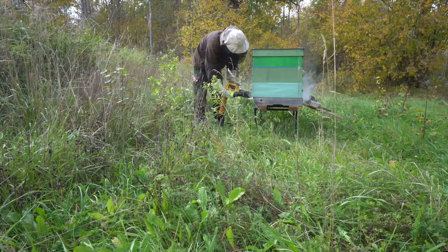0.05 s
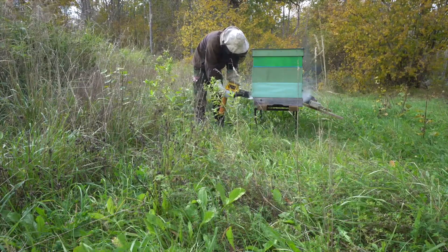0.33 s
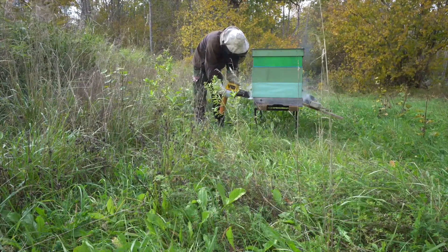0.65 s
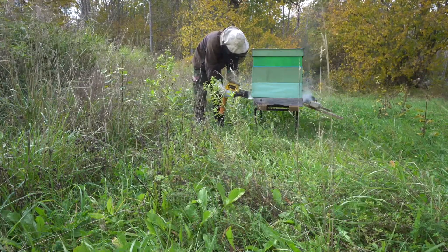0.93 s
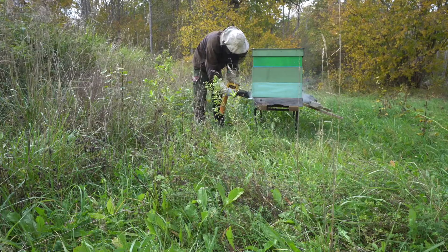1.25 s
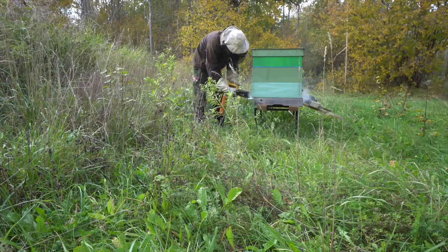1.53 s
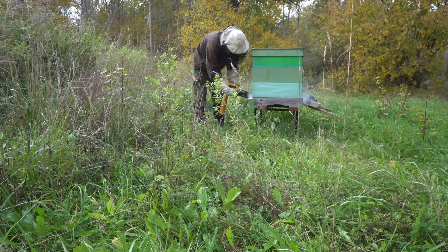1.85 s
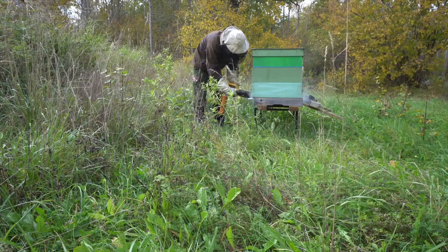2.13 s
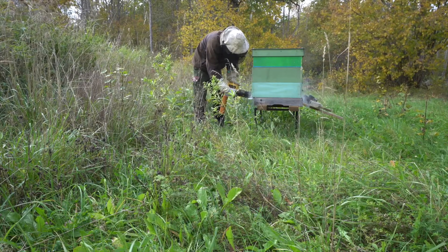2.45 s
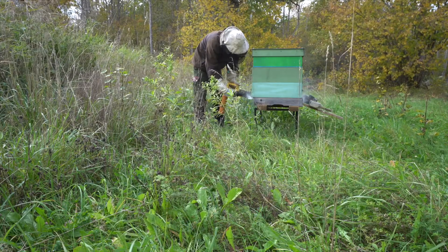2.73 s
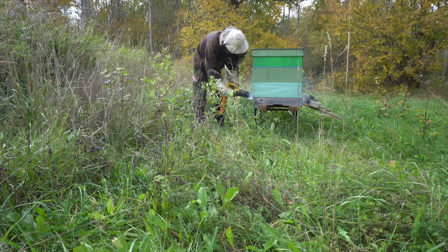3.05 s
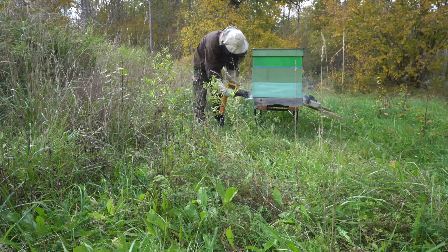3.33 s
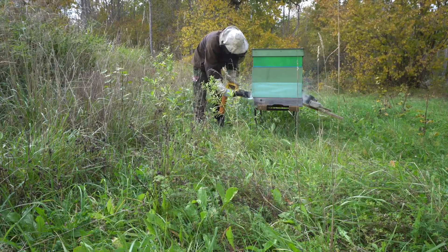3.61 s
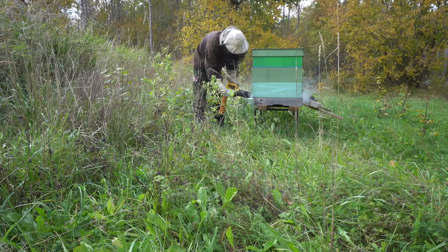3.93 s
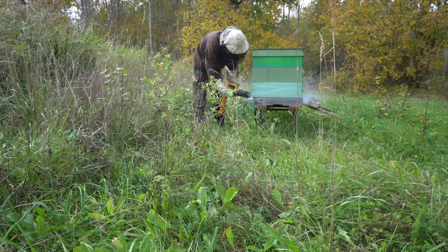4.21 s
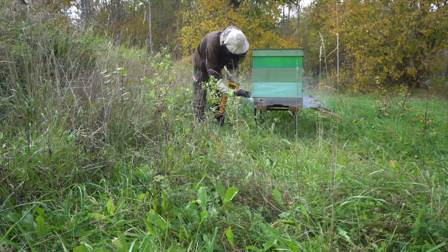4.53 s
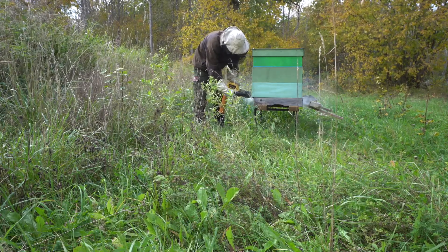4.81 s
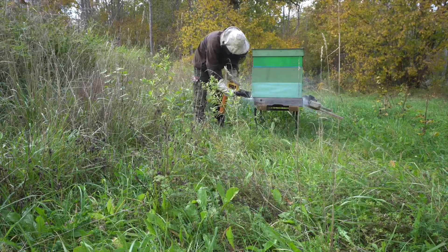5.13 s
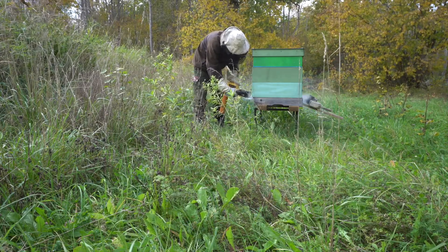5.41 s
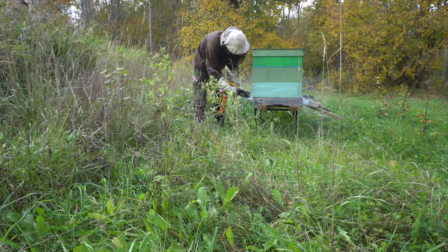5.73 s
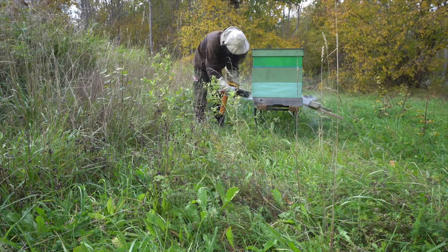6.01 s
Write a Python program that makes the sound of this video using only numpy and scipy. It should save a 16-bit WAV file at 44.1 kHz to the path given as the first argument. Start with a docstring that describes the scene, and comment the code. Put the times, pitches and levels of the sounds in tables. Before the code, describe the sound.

A handheld vaporiser blows into a beehive in a meadow, a few metres away and slightly to the right. Its burner makes a steady, slightly hollow rush throughout, a little stronger at first. From the start, a bright, fluttering vapour hiss lies over it, with a thin, very high ring from the nozzle. Light wind gives the microphone soft, low bumps during the first 1.7 seconds. The jet dies down near 1.9 seconds, leaving the burner running. At about 2.7 seconds it gives a tiny, high spit, and at 2.8 it surges back, pulsing slightly as it builds. More soft wind bumps come between 3.6 and 4.3 seconds. The hiss crests near 5 seconds with faint, airy whistles, its tone sweeping up and back down as the nozzle shifts in the hive entrance. It eases slightly and is still going at the end, just after 6 seconds.

```python
"""A handheld vaporiser blows into a beehive in a meadow, a few metres away; its burner rushes throughout.
At first the vapour jet hisses, ringing the nozzle near 9 kHz, and light wind bumps the microphone.
The jet dies down near 1.9 s, spits, and surges back at 2.8 s; more wind bumps follow around 4 s.
The hiss crests near 5 s with faint whistles, swept by the gap at the hive entrance as the hand moves."""
import sys
import numpy as np
from scipy import signal
from scipy.fft import rfft, irfft, next_fast_len
from scipy.io import wavfile
from scipy.ndimage import uniform_filter1d, map_coordinates

SR = 44100
rng = np.random.default_rng(int(sys.argv[2]) if len(sys.argv) > 2 else 0)


def dump_mix(stems):
    """Bounce the given channels to the path in sys.argv[1] as a 16-bit WAV at rate SR."""
    frames = np.atleast_2d(stems).T  # one column per channel
    limited = np.clip(frames, -1, 1)  # hard clip at full scale
    pcm = np.round(limited * 32767).astype(np.int16)
    wavfile.write(sys.argv[1], SR, pcm)


N = 276066

# Vapour blasts. Each row: start, crest and end in seconds, strength in dB.
VAPOUR_BLASTS = [(-1, -.5, 1.86, -2.1), (2.77, 5.05, 7, 0)]
# Jet, burner and wind spectra. Each row: frequency in Hz, relative density in dB.
HISS_SPECTRUM = [(1000, -22), (2200, 1), (3500, 1.5), (5000, 2), (7000, 1.5), (8200, 2), (10000, 1.5),
                 (11800, 2), (13200, 1.5), (14000, 2.5), (15500, 3.5), (16500, -4)]
BURNER_SPECTRUM = [(25, -56), (60, -23), (110, -17), (165, -15), (230, -3.5), (400, -8), (700, -7.5),
                   (1200, -3.5), (1700, -3), (3000, -1.5), (4500, -3.5), (7000, -8.5), (11000, -11.5),
                   (16000, -18)]
WIND_SPECTRUM = [(20, -27.5), (45, -5), (80, -3), (130, -3.5), (220, -8.5), (500, -32), (1500, -90)]
# Stereo likeness of jet and burner. Each row: frequency in Hz, left-right correlation.
HISS_COHERENCE = [(4000, 1), (7000, 0.39), (9000, 1), (12000, 0.53), (15500, 0.76)]
BURNER_COHERENCE = [(100, 1), (350, 0.956), (800, 0.75), (1300, 0.68), (1900, 0.57), (3000, 0.34),
                    (5000, 0.082), (8000, 0.039), (15000, 0.091)]
# Nozzle and burner tube resonances. Each row: centre in Hz, width in Hz, gain in dB.
NOZZLE_MODES = [(6200, 210, 0), (8660, 200, 0), (8350, 86, -9), (9180, 290, 8), (9800, 250, -8),
                (11000, 120, -16), (12300, 250, -21.5), (13720, 220, -19)]
TUBE_MODES = [(328, 66, 7), (526, 153, 7), (743, 103, 5), (977, 120, 5), (1220, 260, 4.5), (1451, 56, 5),
              (2230, 53, 3.9), (2590, 100, 1), (4040, 500, 1)]
# Gap between nozzle and hive. Each row: time in seconds, antiresonance in Hz.
GAP_NOTCH_PATH = [(0, 12500), (2.6, 12400), (2.9, 11650), (3.8, 10800), (4.36, 11700), (4.78, 16300),
                  (5.57, 16200), (5.8, 13400), (6, 12200), (6.26, 11700)]
# Gap peaks and dips. Each row: ratio to the antiresonance, relative width, gain in dB at full coupling.
GAP_BANDS = [(.29, .1, -14), (.4, 0.086, 5.5), (.51, 0.015, -4), (.61, 0.03, 4), (.725, 0.028, -0.5),
             (.86, .05, 4.5), (1, 0.024, -7.5), (1.16, .03, 3.5)]
# Jet whistles. Each row: centre and sigma in seconds, pitch and width in Hz, level in dB.
EDGE_TONES = [(.1, 0.18, 10900, 200, -55), (1.63, .05, 10870, 160, -53), (2.702, 0.039, 11650, 140, -46.5),
              (3.897, 0.21, 5080, 100, -47), (5.03, 0.47, 9900, 650, -43.5), (5.496, .16, 13750, 500, -43),
              (5.85, 0.27, 5000, 202, -52), (5.85, 0.204, 5620, 200, -49.5)]
# Gusts. Each row: centre and sigma in seconds, level in dB.
WIND_GUSTS = [(.06, .09, -50), (.8, 0.35, -63), (1.58, 0.13, -56), (4.114, 0.27, -55)]
# Eddies on the microphone. Each row: centre in seconds, level in dB, sigma in seconds, pitch in Hz.
WIND_EDDIES = [(0.005, -42, 0.017, 108), (0.123, -44.5, 0.034, 226), (0.141, -36.5, 0.0092, 161),
               (0.606, -48, .016, 101), (0.846, -43, 0.0051, 113), (0.963, -45.5, 0.019, 87),
               (1.481, -39, 0.0068, 160), (1.701, -37, 0.0079, 120), (3.58, -49, 0.011, 96),
               (3.866, -44, 0.041, 110), (4.133, -46, 0.0094, 90), (4.287, -39.5, 0.015, 124)]
# Stereo balance. Each row: frequency in Hz, left minus right in dB.
BALANCE_DB = [(60, -0.5), (110, -0.5), (200, -1.0), (380, -1.5), (700, -1), (1290, -1.5), (2380, -3),
              (4400, -1.0), (8120, 1), (15000, -1.0)]
# Stereo phase. Each row: frequency in Hz, left lead in radians.
LEFT_LEAD_RAD = [(50, 0.18), (400, -0.04), (1200, -0.3), (2200, 0.71), (4500, -1.1), (6000, -1),
                 (9000, -0.78), (12000, -0.013), (14500, -1.05), (15800, -0.18)]


def jet(gain_db=-35.5, ring_db=-5.5, ring_fade_db_per_s=1.05):
    """Fluttering vapour hisses and rings the nozzle; both pass through the gap."""
    flow = vapour_flow()
    hiss = turbulence(lambda hz: amp(log_interp(HISS_SPECTRUM, hz)), HISS_COHERENCE, patchy_db=2.7)
    nozzle = lambda hz: sum(amp(db) * resonance(hz, centre, width) for centre, width, db in NOZZLE_MODES)
    ring = turbulence(nozzle, [(9000, .85)], patchy_db=1.5)
    ring_gain = amp(ring_db - ring_fade_db_per_s * np.arange(N) / SR)
    flutter = amp(.55 * wobble(rate_hz=18) + .22 * wobble(rate_hz=45))
    return amp(gain_db) * flutter * hive_gap(flow * (hiss + ring_gain * ring))


def vapour_flow(attack_s=.028, release_s=.25, arch_db_per_s2=.97):
    """Each blast opens with fading surges, arches over its crest and peters out."""
    surge_depth_db, surge_fade_s, surge_hz, surge_delay_s = 1.94, 1.4, 2.97, .09
    leak_share, leak_s = .43, .28  # some vapour seeps out ahead of the blast
    time_s, flow = np.arange(N) / SR, np.zeros(N)
    for start_s, crest_s, end_s, strength_db in VAPOUR_BLASTS:
        age_s = np.maximum(time_s - start_s, 0)
        surge = np.cos(2 * np.pi * surge_hz * (age_s - surge_delay_s))
        surge_db = surge_depth_db * np.exp(-age_s / surge_fade_s) * surge
        rise = (1 - leak_share) * step(start_s, attack_s) + leak_share * step(start_s, leak_s)
        gate = rise * (1 - step(end_s, release_s))
        flow += gate * amp(strength_db - arch_db_per_s2 * (time_s - crest_s) ** 2 + surge_db)
    return flow


def hive_gap(x, corner_hz=6000, loose_coupling=.36, tight_coupling=.95, seated_s=2.4):
    """The unsteady hand shifts the nozzle in the entrance; the gap's peaks and dips slide together."""
    hz, frame_s, spectra = signal.stft(x, SR, nperseg=512)
    tremor = 1 + .016 * np.interp(frame_s * SR, np.arange(N), wobble(rate_hz=11))
    notch_hz = tremor * np.interp(frame_s, *np.transpose(GAP_NOTCH_PATH))
    ratio = (hz[:, None] + 1) / notch_hz
    shape_db = sum(db * np.exp(-.5 * (np.log(ratio / at) / width) ** 2) for at, width, db in GAP_BANDS)
    highpass = 1 - 1 / (1 + (hz[:, None] / corner_hz) ** 8)  # only waves shorter than the gap feel it
    coupling = np.where(frame_s < seated_s, loose_coupling, tight_coupling)
    return signal.istft(spectra * amp(shape_db * highpass * coupling), SR, nperseg=512)[1][:, :N]


def whistles():
    """The jet catches an edge and sings in narrow bands."""
    out = np.zeros(N)
    for centre_s, sigma_s, pitch_hz, width_hz, level_db in EDGE_TONES:
        tone = filtered(rng.standard_normal(N), lambda hz: resonance(hz, pitch_hz, width_hz))
        out += amp(level_db) * swell(centre_s, sigma_s) * unit_rms(tone)
    return out


def burner(gain_db=-36.5, settled_db=-.5, excess_db=3.5, settle_s=1.65, crossover_hz=1900):
    """A steady rush coloured by the tube's resonances; starts strong, dulls as it settles."""
    tube_db = lambda hz: sum(db * resonance(hz, centre, width) for centre, width, db in TUBE_MODES)
    colour = lambda hz: amp(log_interp(BURNER_SPECTRUM, hz) + tube_db(hz))
    rush = turbulence(colour, BURNER_COHERENCE, patchy_db=1.1)
    body = filtered(rush, lambda hz: 1 / (1 + (hz / crossover_hz) ** 4))
    fizz = rush - body
    drive_db = settled_db + excess_db * np.exp(-np.arange(N) / SR / settle_s) + .25 * wobble(rate_hz=14)
    return amp(gain_db) * (amp(.82 * drive_db) * body + amp(1.47 * drive_db) * fizz)


def wind(calm_db=-88):
    """A breeze rumbles in gusts; single eddies bump the microphone."""
    breeze = amp(calm_db) + sum(amp(db) * swell(at_s, sigma_s) for at_s, sigma_s, db in WIND_GUSTS)
    flutter = amp(2.5 * wobble(rate_hz=16))
    rumble = turbulence(lambda hz: amp(log_interp(WIND_SPECTRUM, hz)), [(100, .56)], patchy_db=5)
    air = breeze * flutter * rumble
    for centre_s, level_db, sigma_s, pitch_hz in WIND_EDDIES:
        envelope = swell(centre_s, sigma_s)
        push = rng.standard_normal(N) + .35 * rng.standard_normal((2, N))  # shared + per port
        eddy = filtered(envelope * push, lambda hz: (hz / pitch_hz) ** 2.5 / (1 + (hz / pitch_hz) ** 6))
        air += amp(level_db) * unit_rms(eddy) * np.sqrt(np.mean(envelope ** 2))
    return air


def turbulence(colour, coherence, patchy_db):
    """Stereo noise of rms 1 with narrow, slowly drifting patches of gain."""
    spectra = signal.stft(rng.standard_normal((2, N)), nperseg=2048)[2]
    patches = uniform_filter1d(rng.standard_normal(spectra.shape[1:]), size=4, axis=0)
    patches = uniform_filter1d(patches, size=28, axis=1)
    pair = signal.istft(spectra * amp(patchy_db * unit_rms(patches)), nperseg=2048)[1][:, :N]
    spread_rad = lambda hz: np.arccos(np.clip(log_interp(coherence, hz), -1, 1)) / 2
    mid, side = filtered(pair, lambda hz: colour(hz) * [np.cos(spread_rad(hz)), np.sin(spread_rad(hz))])
    return unit_rms(np.array([mid + side, mid - side]))


def amp(db):
    """Decibels to gain."""
    return 10 ** (np.asarray(db) / 20)


def unit_rms(x):
    """Scale to rms 1."""
    return x / np.sqrt(np.mean(x ** 2) + 1e-20)


def log_interp(points, hz):
    """Interpolate (Hz, value) points on a log axis."""
    knots_hz, values = np.transpose(points)
    return np.interp(np.log(hz + 1), np.log(knots_hz + 1), values)


def wobble(rate_hz):
    """Smooth random curve through knots at rate_hz."""
    knots = rng.standard_normal(int(N * rate_hz / SR) + 4)
    return map_coordinates(knots, [np.arange(N) * rate_hz / SR])


def swell(centre_s, sigma_s):
    """Gaussian envelope, peak 1."""
    return np.exp(-.5 * ((np.arange(N) / SR - centre_s) / sigma_s) ** 2)


def step(centre_s, tau_s):
    """Smooth step from 0 to 1."""
    return .5 + .5 * np.tanh((np.arange(N) / SR - centre_s) / (2 * tau_s))


def resonance(hz, centre_hz, width_hz):
    """Lorentzian curve, peak 1."""
    return 1 / (1 + (2 * (hz - centre_hz) / width_hz) ** 2)


def filtered(x, response):
    """Apply a complex frequency response."""
    size = next_fast_len(N + SR // 2)
    return irfft(rfft(x, size) * response(np.fft.rfftfreq(size, 1 / SR)), size)[..., :N]


def scene():
    """Vaporiser slightly to the right, mostly earlier and louder there; wind on the microphone."""
    vaporiser = burner() + jet() + whistles()
    left = lambda hz: amp(log_interp(BALANCE_DB, hz) / 2) * np.exp(.5j * log_interp(LEFT_LEAD_RAD, hz))
    return filtered(vaporiser, lambda hz: np.array([left(hz), 1 / left(hz)])) + wind()


def record(dry, cutoff_hz=15750):
    """Brick-wall low-pass."""
    return filtered(dry, lambda hz: hz < cutoff_hz)


dry = scene()
out = record(dry)
dump_mix(out)
```